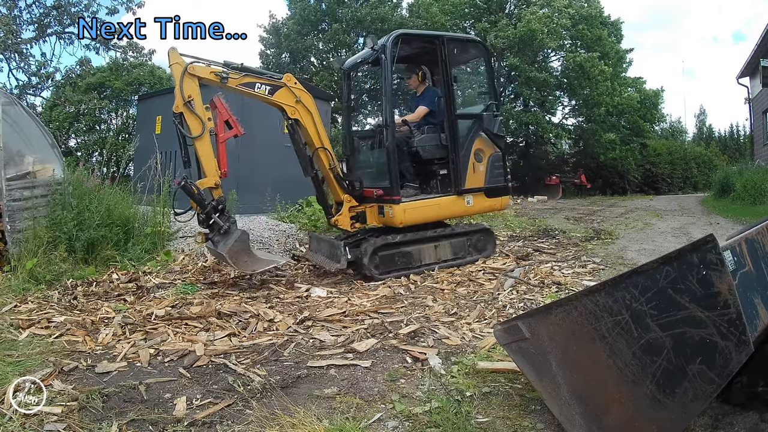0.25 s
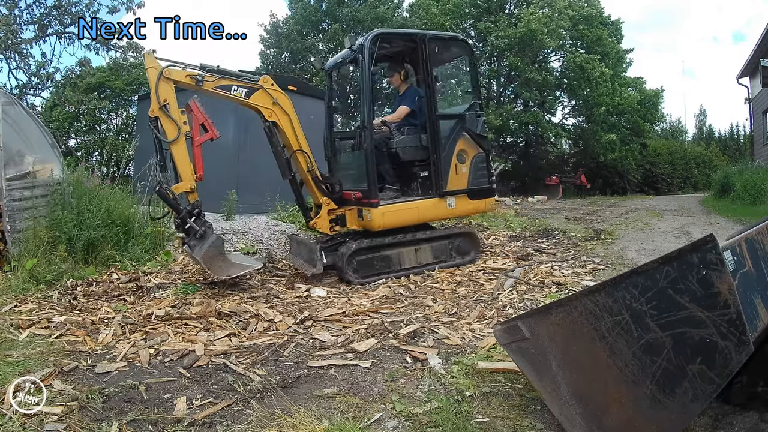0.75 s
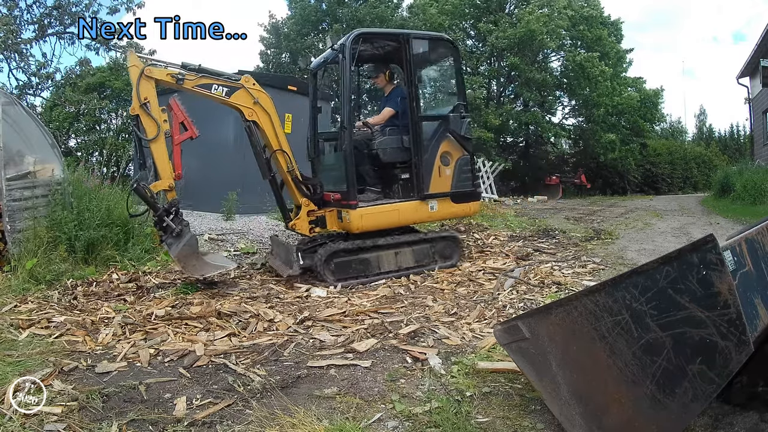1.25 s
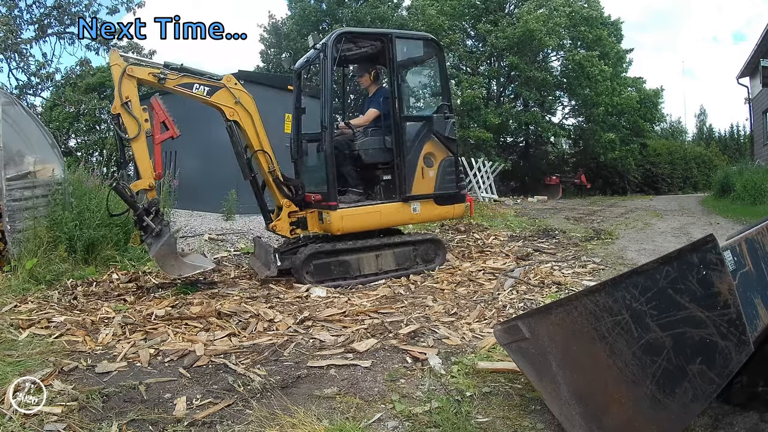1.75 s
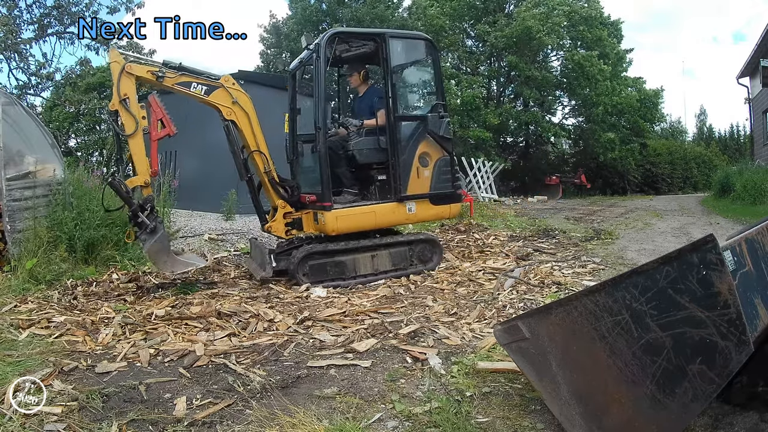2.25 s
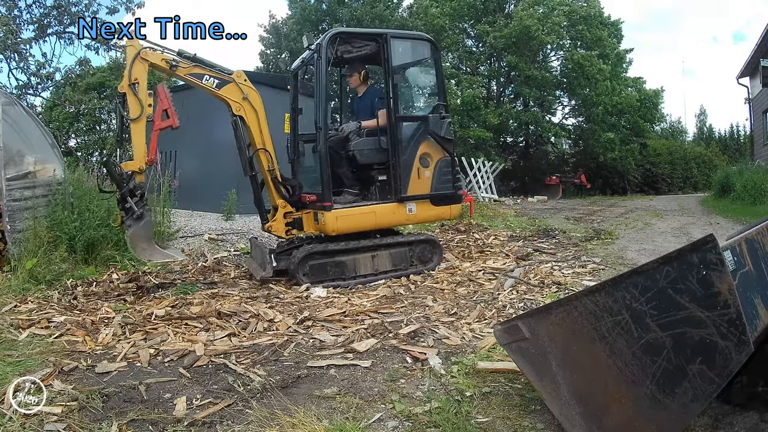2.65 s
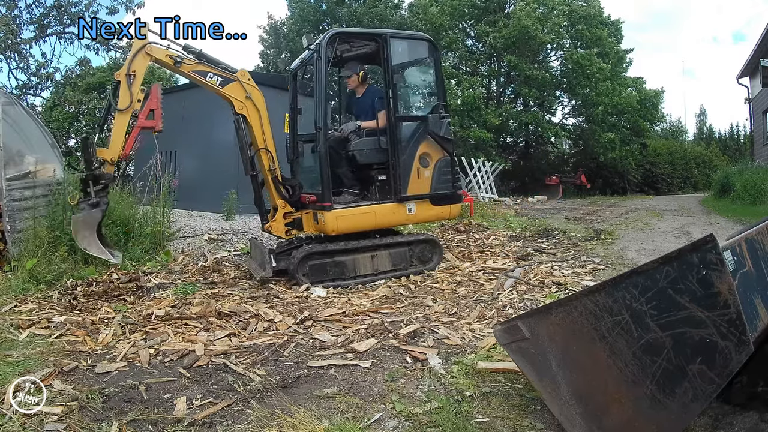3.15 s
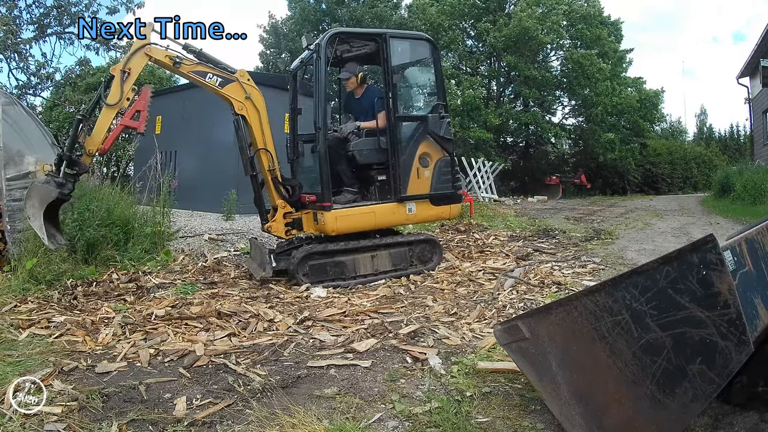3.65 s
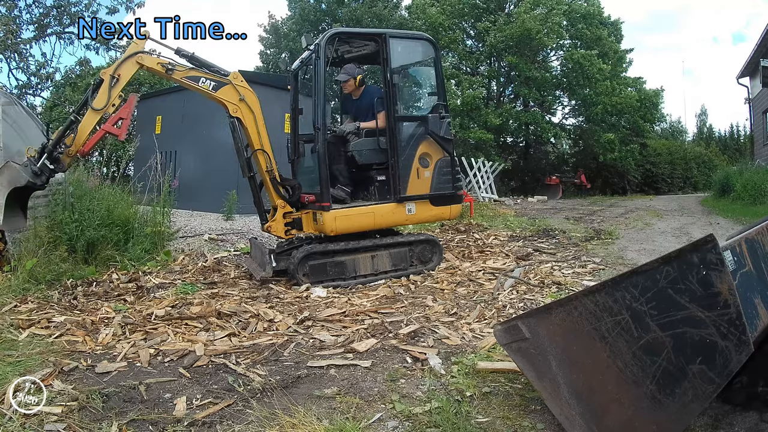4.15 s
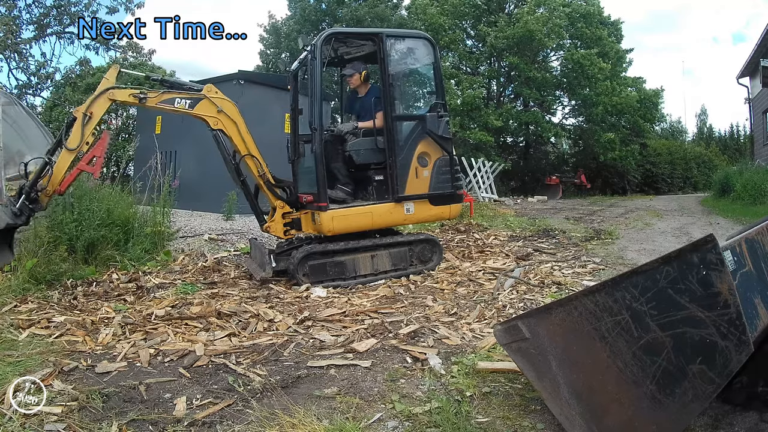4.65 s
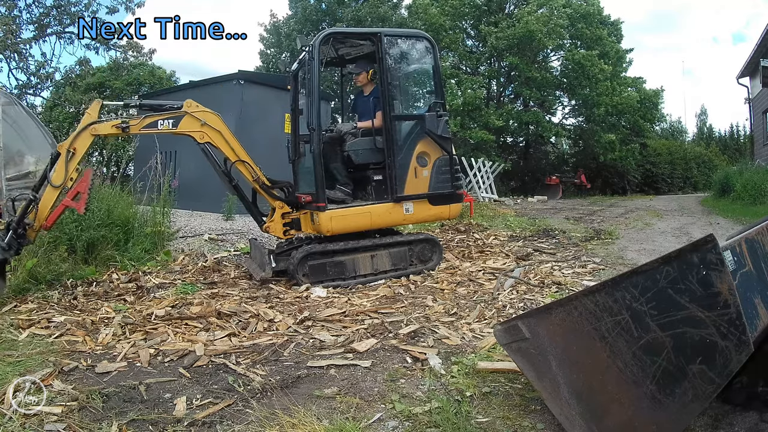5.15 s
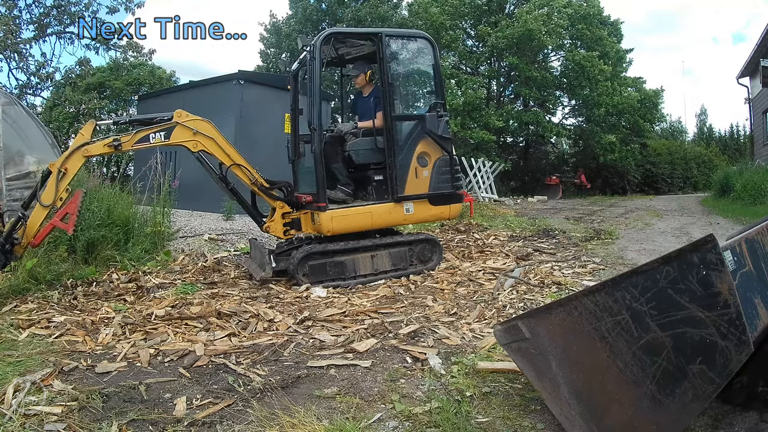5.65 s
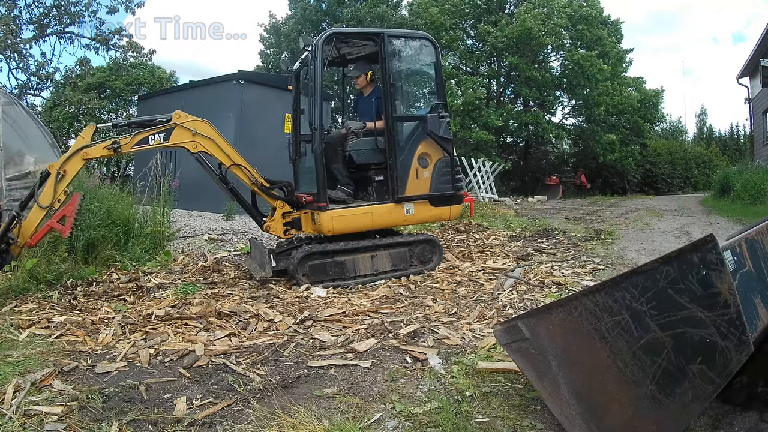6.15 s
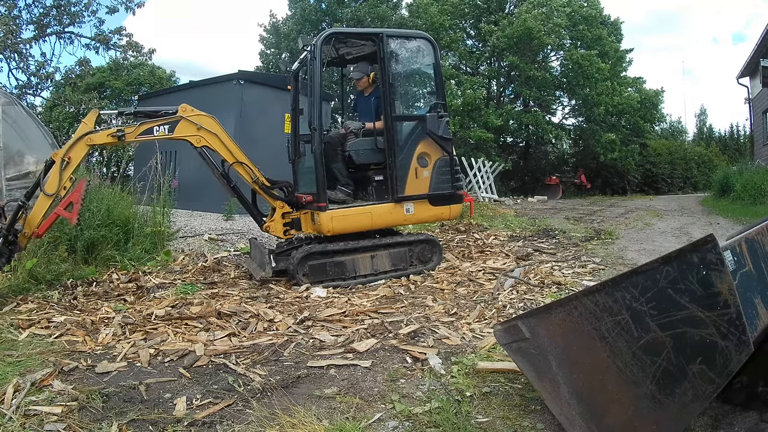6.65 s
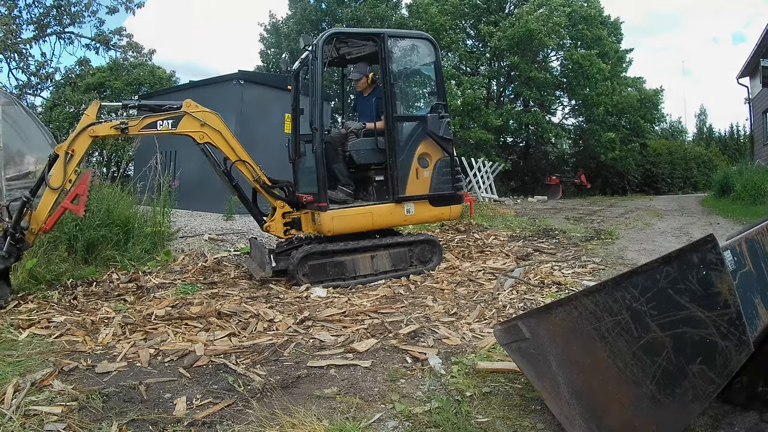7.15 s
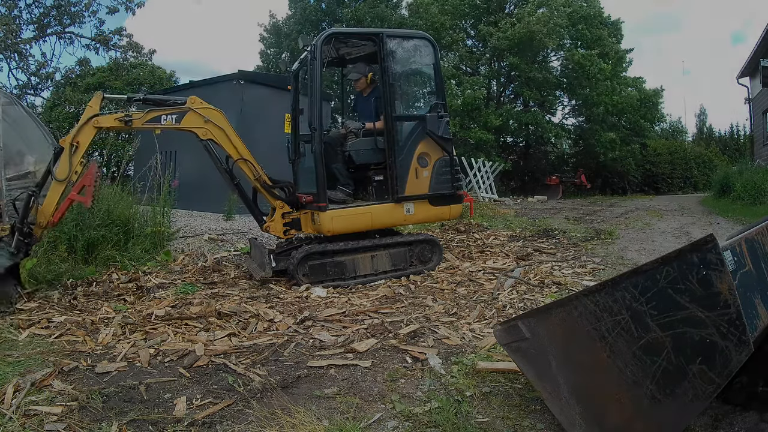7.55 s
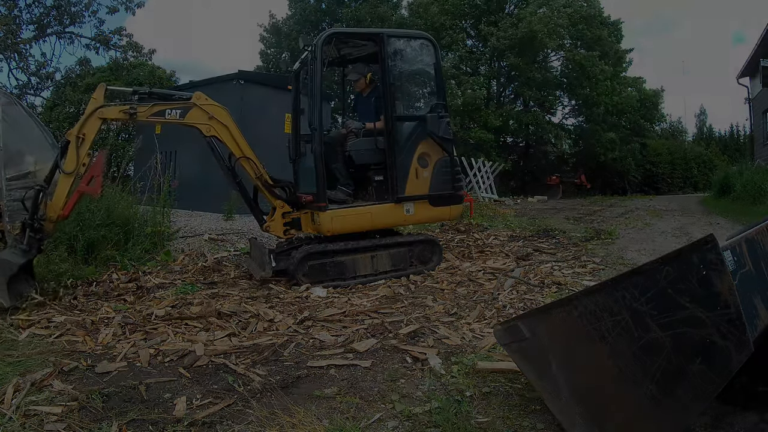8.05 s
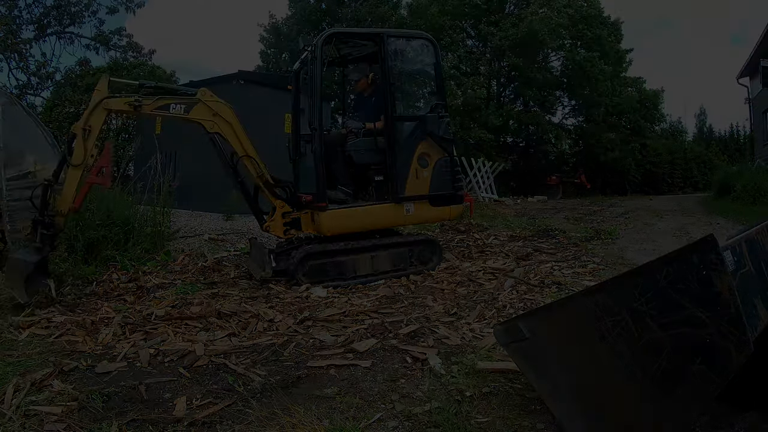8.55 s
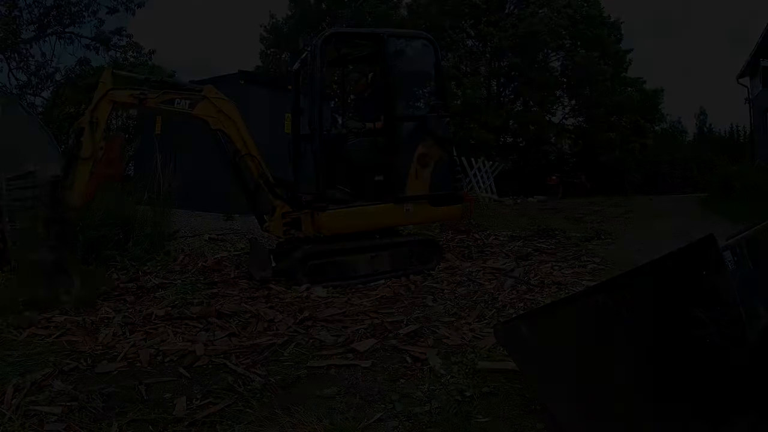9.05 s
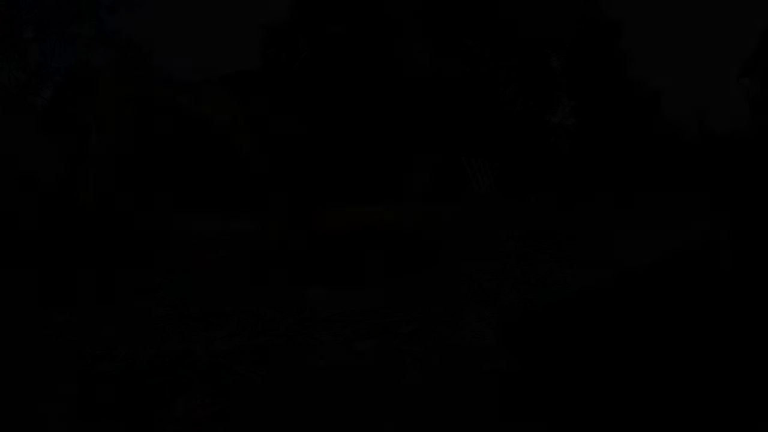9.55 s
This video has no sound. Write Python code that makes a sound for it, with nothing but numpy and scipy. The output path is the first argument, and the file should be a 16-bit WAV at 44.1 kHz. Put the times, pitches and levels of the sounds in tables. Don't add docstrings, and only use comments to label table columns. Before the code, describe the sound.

A small excavator's diesel engine drones steadily outdoors, with early track rattle, wood snaps and metal clanks, a brief digging crunch, then a slow fade.

```python
import sys
import numpy as np
from scipy import signal
from scipy.fft import rfft, irfft, next_fast_len
from scipy.io import wavfile
from scipy.ndimage import uniform_filter1d

SR = 44100
rng = np.random.default_rng(int(sys.argv[2]) if len(sys.argv) > 2 else 0)


def transcribe(u):
    v = np.clip(np.atleast_2d(u).T, -1, 1)
    q = np.round(v * 32767).astype(np.int16)
    wavfile.write(sys.argv[1], SR, q)


def convert_level_to_amplitude(level_db):
    exponent = np.asarray(level_db, float) / 20
    return 10 ** exponent


N = 431290
T = np.arange(N) / SR

# [start_s, speed_rpm]
CRANK_SPEED = [(0.0, 1403.2), (0.93, 1425.3), (1.2, 1386.1), (1.73, 1405.9), (2.08, 1503.1), (2.27, 1360.5),
               (2.54, 1419.5), (2.65, 1313.5), (2.92, 1369.5), (3.93, 1337.8), (4.27, 1391.1),
               (5.83, 1394.5), (6.11, 1448.7), (6.41, 1344.6), (6.9, 1398.5), (7.5, 1354.2), (7.92, 1376.2),
               (9.78, 1371.2)]
# [multiple of the cycle rate, level_db]
EXHAUST_ORDERS = [(1, -42), (2, -36), (3, -20), (4, -29), (5, -23), (6, 0), (7, -18), (8, -21), (9, -14),
                  (10, -32), (11, -29), (12, -25), (13, -26), (14, -23), (15, -10), (16, -38), (17, -44),
                  (18, -27), (19, -33), (20, -38), (21, -18), (22, -34), (23, -42), (24, -20), (25, -33),
                  (26, -41), (27, -27), (28, -46), (29, -49), (30, -31), (31, -36), (32, -48), (33, -27),
                  (34, -46), (35, -43), (36, -37)]
# [chatter_db, panel_1khz_db, thud_db, bright_thud_db]
CYLINDER_KNOCKS = [
    (-7.5, -3.5, -13, -5.5),
    (8, -5, 0, 0),
    (7.5, 5.5, -3, -0.5),
]
# [pitch_hz, width_hz, level_db]
THUD_MODES = [(526, 60, -2), (631, 94, 0), (1900, 230, -15), (1010, 62, 1.5), (2800, 200, -13),
              (5200, 210, -35), (4040, 200, -29)]
# [pitch_hz, width_hz, level_db]
BLOCK_MODES = [(630, 360, 8.5), (960, 140, 3), (1497, 50, 10.5), (1840, 280, 7.5), (3320, 65, -48),
               (3960, 180, -24), (4640, 110, -39), (5170, 160, -32)]
# [place in the cycle 0-1, pitch_hz, width_hz, peak_db]
VALVE_TAPS = [(0.95, 535, 360, -29), (.085, 520, 250, -38.5), (.062, 3000, 1800, -55),
              (.16, 1000, 300, -44), (.375, 1850, 250, -41), (.47, 1900, 480, -46), (.705, 1850, 200, -38),
              (.772, 2020, 220, -39), (.345, 5100, 400, -58), (.65, 1450, 150, -43), (.33, 980, 110, -39),
              (1, 1050, 160, -45.5), (.31, 3950, 280, -54.5), (.69, 3950, 280, -54.5),
              (.88, 3600, 220, -55.5), (.5, 3950, 240, -56), (.69, 5000, 250, -55.5), (.1, 1800, 330, -45),
              (.682, 5150, 350, -56), (.325, 2400, 280, -48.5), (.66, 2850, 290, -47)]
# [pitch_hz, width_hz, level_db]
COVER_MODES = [(2900, 220, -1), (3948, 200, -5.5), (4664, 180, -10), (5150, 260, -14)]
# [pitch_hz, level_db per Hz]
WASH_SPECTRUM = [(240, -24), (400, -1.5), (461, -11), (519, -3), (611, -4), (856, -12), (1010, -10),
                 (1120, -9), (1890, -11), (3190, -32), (3920, -37.5), (5140, -42), (5370, -43), (6980, -72),
                 (11800, -120)]
# [middle_s, half_length_s, peak_db]
ARM_STROKES = [
    (1.403, .4, -65),
    (4.602, .7, -59.5),
    (6.294, 1.1, -69),
]
# [pitch_hz, level_db per Hz]
GROUND_SPECTRUM = [(12, -12), (25, -4), (45, -4.5), (90, 6.5), (150, -21), (300, -46.5)]
# [peak_s, level_db]
RUMBLE_SWELLS = [(0.0, -32), (0.3, -37), (0.74, -34), (1.14, -24), (1.39, -35), (1.71, -37), (2.25, -32.5),
                 (2.57, -27.5), (2.7, -28.5), (3.17, -26), (4.06, -38), (4.96, -41.5), (5.69, -33),
                 (5.88, -30), (6.25, -30), (6.46, -30), (6.6, -28), (6.93, -24.5), (7.11, -32), (7.33, -36.5),
                 (7.869, -36.5), (8.17, -33), (8.4, -38.5), (8.69, -37), (9.2, -34)]
# [pitch_hz, level_db per Hz]
DRONE_SPECTRUM = [(40, -20.5), (80, -18), (135, -11), (200, -8), (260, -5.5), (330, -16.5), (420, -15.5),
                  (600, -36)]
# [pitch_hz, width_hz, level_db]
TRACK_MODES = [(474, 140, 1), (760, 130, 0), (1500, 370, -10), (2900, 900, -14.5)]
# [start_s, peak_db, pitch_hz]
WOOD_SNAPS = [(.0348, -32, 1600), (.0672, -33, 2400), (.2069, -35, 2000), (.2345, -34, 3100),
              (.2927, -31, 3900), (.3375, -34, 3700), (.3506, -33, 2750), (.4329, -30, 1600),
              (.5075, -35, 3900), (.5367, -29, 2100), (.5831, -38, 1420), (.601, -35, 3800),
              (.6559, -33, 1590), (.6918, -35, 1670), (.7153, -34, 1550), (.7716, -35, 1490),
              (.7971, -33, 1600), (.8195, -32, 1630), (.8755, -37, 5200), (.8812, -32, 3800),
              (0.8833, -14, 1300), (0.885, -28, 2600), (.885, -36, 6000), (1.0385, -36, 1620),
              (1.0745, -33, 1890), (1.13, -24, 5300), (1.1567, -23, 5100), (1.157, -25, 3700),
              (1.1572, -36, 8800), (1.1685, -29, 5100), (1.188, -30, 2400), (1.1918, -30, 5000),
              (1.192, -30, 3800), (1.2276, -32, 1630), (1.2456, -35, 3600), (1.2456, -34, 5100),
              (1.2905, -34, 4000), (1.3212, -33, 5000), (1.4365, -27, 3000), (1.508, -35, 1450),
              (1.5584, -33, 1590), (1.6566, -31, 1730), (1.8008, -37, 1460), (2.407, -30, 1000),
              (2.574, -27, 600), (2.599, -30, 4120), (2.62, -28, 2800), (2.6805, -30, 2500),
              (2.722, -30, 2200), (2.76, -29, 2700), (2.785, -28, 2700), (2.794, -29, 2700),
              (4.954, -32, 700), (5.9, -31, 700), (6.411, -34, 2900), (6.499, -28, 900), (6.528, -31, 1800),
              (6.705, -30, 1000), (6.935, -29, 800)]
# [start_s, peak_db, pitch_hz, crack_db]
DULL_CLANKS = [(0.036, -32, 761, -7), (0.073, -26, 760, -22), (0.15, -28.5, 710, -2),
               (0.263, -15, 803, -21.5), (0.29, -22, 854, -5.5), (0.351, -35, 625, 6.5),
               (0.402, -24, 1500, -10), (0.498, -23, 840, -13.5), (0.531, -20.5, 1134, -8),
               (0.549, -23.5, 760, -13), (0.629, -25, 735, -12), (0.737, -24, 776, -18),
               (0.884, -25.5, 1020, -12), (0.966, -21.5, 640, -14), (1.061, -31, 643, -10),
               (1.294, -24, 844, 1), (1.385, -22, 680, -17), (1.437, -21.5, 750, -1),
               (1.599, -23, 670, -22), (1.66, -25, 760, -2), (1.736, -27, 626, -11),
               (1.983, -25, 630, -17.5), (2.353, -27, 594, -3), (2.407, -27, 610, -17),
               (2.679, -28, 735, -10), (2.763, -28, 760, -10)]
# [start_s, peak_db, pitch_hz, crack_db]
PIN_TICKS = [(0.232, -31, 2100, -4), (0.2907, -34, 1810, 0), (0.3003, -24.5, 3800, -4),
             (0.336, -37, 2010, -2), (0.351, -28.5, 2540, -8), (0.4327, -22.5, 2800, -16),
             (0.5036, -34.5, 2380, 0), (0.5987, -33, 2210, 5), (0.7, -41.5, 1830, 5),
             (0.8214, -35, 1950, -1), (0.8674, -29, 3920, 1), (0.883, -30, 2100, -10),
             (1.1294, -17, 3920, 1.5), (1.1918, -30, 3900, -4), (1.245, -37.5, 1870, 15.5),
             (1.2904, -29, 2440, 3), (1.321, -37, 1900, -3), (1.4373, -16, 1950, -10),
             (1.5979, -25.5, 1900, -10.5), (2.263, -35, 1844, -11), (2.3521, -28, 1960, -7),
             (3.054, -37, 1900, -4), (4.065, -36.5, 2110, 9), (6.23, -29.5, 1810, -5),
             (6.9127, -35, 1930, -8)]
# [pitch_hz, level_db, t60_s]
PIN_MODES = [(3914, 0, 0.031), (4950, -28, 0.019), (5440, -29, 0.039), (6611, -33.5, 0.094),
             (7250, -28, 0.24), (8900, -23, 0.041)]
# [start_s, length_s, level_db, body_hz, tilt_db an octave]
DEBRIS_CRUNCHES = [(0.864, 0.028, -39, 3500, 0), (1.289, 0.039, -42, 9300, -10),
                   (0.885, 0.0099, -29.5, 1370, -9.5), (2.574, 0.018, -35, 600, -13.5),
                   (2.598, 0.033, -34.5, 1300, -4), (2.8, .035, -39, 6300, -13),
                   (2.597, .02, -37, 4100, -6), (0.866, 0.029, -43, 8600, -10),
                   (1.13, 0.0074, -37, 3700, -3), (1.157, 0.03, -41, 5400, -2.5),
                   (1.135, .05, -43, 10000, -14), (1.14, .06, -46, 3400, -3.5),
                   (1.1, .012, -45.5, 8400, -12), (2.62, .05, -39, 1500, -12), (2.72, .04, -43, 1700, -18),
                   (6.497, 0.045, -39, 1500, -3), (2.679, 0.04, -33, 1300, -9),
                   (2.758, 0.023, -34, 1600, -12), (2.765, 0.032, -35.5, 2660, -23),
                   (2.685, 0.038, -39, 2000, -19), (6.504, 0.029, -39.5, 1950, -8.5),
                   (6.616, .02, -43, 1900, -2), (6.915, 0.014, -42.5, 2200, 1),
                   (1.149, 0.038, -35, 180, -4), (1.95, 0.2, -31, 140, -16), (2.565, 0.08, -23, 140, -8),
                   (3.4, 0.06, -25, 120, -9), (6.394, 0.094, -27, 120, -16)]
# [pitch_hz, level_db, t60_s]
BUCKET_MODES = [(729, -2, .09), (837, -6, 0.17), (926, 1, 0.15), (1001, -3.5, 0.15), (1130, -4, .18),
                (1511, -3.5, .12), (1640, -7.5, .08), (2196, -15, .08), (2717, -8, .08), (3305, -17, 0.09),
                (4040, -17, .07)]
# [start_s, length_s, level_db, tilt_db an octave]
BUCKET_SCRAPES = [
    (2.598, 0.015, -35, 4.5),
    (2.617, 0.013, -33.5, 3.5),
    (2.679, 0.015, -29, -2),
    (2.701, .012, -32, 0),
    (2.76, .02, -31, 1.5),
    (2.785, 0.015, -32.5, -1),
    (6.499, .02, -37, -1),
    (6.528, 0.016, -37, 0),
]
# [pitch_hz, level_db]
MIC_RESPONSE = [(4800, 0), (5400, -2.5), (6000, -9.5), (6600, -8), (7100, -11.5), (7500, -23.5),
                (8200, -10.5), (9300, -10.5), (9900, -29), (11000, -18), (12000, -42.5), (13000, -21.5),
                (15500, -32.5)]


def evened(x):
    return x / np.sqrt(np.mean(x ** 2) + 1e-20)


def colour(x, points):
    hz, db = np.transpose(points)
    size = next_fast_len(len(x) + 4096)
    log_hz = np.log(np.fft.rfftfreq(size, 1 / SR) + 1)
    return irfft(rfft(x, size) * convert_level_to_amplitude(np.interp(log_hz, np.log(hz), db)), size)[:len(x)]


def ring(x, hz, width):
    return signal.lfilter(*signal.iirpeak(hz, hz / width, SR), x)


def body_ring(x, hz, width):
    return ring(ring(x, hz, width), hz, 2 * width)


def noise():
    return rng.standard_normal(N)


def uneven(strength_db, count):
    return convert_level_to_amplitude(strength_db * np.minimum(rng.exponential(1, count), 4))


def sparse_taps(per_s, strength_db):
    return (rng.random(N) < per_s / SR) * uneven(strength_db, N)


def drift(hz):
    steps = rng.standard_normal(400 * 10)
    slow = signal.lfilter([1], [1, -np.exp(-2 * np.pi * hz / 400)], steps)
    return evened(np.interp(T, np.arange(len(steps)) / 400, slow))


def speed():
    start_s, rpm = np.transpose(CRANK_SPEED)
    flywheel_s = .12
    return uniform_filter1d(np.interp(T, start_s, rpm), size=round(flywheel_s * SR), mode="nearest")


def load():
    free_rpm, db_per_rpm, runaway_db_per_rpm = 1387.6, -0.0528, -0.0969
    over = speed() - free_rpm
    dig_s, unloaded_db = 2.66, -2.5
    unloaded = np.clip((dig_s - T) / 0.14 + .5, 0, 1)
    return -.8 + db_per_rpm * over + runaway_db_per_rpm * np.maximum(over, 0) + unloaded_db * unloaded


def crawl():
    end_s, stop_s = 1.58, 0.76
    return np.clip((end_s + stop_s - T) / stop_s, 0, 1)


def exhaust(cycle):
    boom_db, pump_db, pump_pistons = -17.5, -52.5, 56
    order, db = np.transpose(EXHAUST_ORDERS)
    shape = np.interp(np.arange(513) / 2, np.r_[0, order[2::3], 256], np.r_[-32, db[2::3], -82])
    lag = -signal.hilbert(np.r_[shape, shape[-2:0:-1]] * np.log(10) / 20).imag
    load_db = load() + .8 * drift(10)
    sharpen = {bite: convert_level_to_amplitude(bite * load_db) for bite in (0, .1, .4, .7, 1.1)}
    slew_s, averted_db = 2.4, -6.5
    sharpen[.5] = convert_level_to_amplitude(.5 * load_db + averted_db * np.clip((slew_s - T) / 0.18, 0, 1))
    out = np.zeros(N)
    for n in range(1, len(db) + 1):
        sign = 1 if n % 3 == 0 else -1
        lead = -.005 * (n > 17)
        if n in (9, 12, 18, 36):
            bite = 1.1
        elif 19 <= n <= 25:
            bite, lead = .5, .0145
        elif n == 15:
            bite = .7
        elif n > 25:
            bite = .4
        else:
            bite = .1 * (n > 9)
        order_db = 1.2 * (n in (9, 12, 15)) + 2 * (n in (12, 36)) - (n > 28)
        phase = 2 * np.pi * n * (cycle + lead) + lag[2 * n]
        out += sign * convert_level_to_amplitude(db[n - 1] + order_db) * sharpen[bite] * np.cos(phase)
    out += convert_level_to_amplitude(pump_db - boom_db + 1.1 * drift(6.4)) * np.cos(2 * np.pi * pump_pistons * cycle)
    return np.sqrt(2) * convert_level_to_amplitude(boom_db + .35 * drift(10)) * out


def knock(cycle):
    firing = 3 * cycle + 0.1203
    count = np.floor(firing).astype(int)
    since_s = (firing - count) / 36.0
    chatter_db, panel_db, thud_db, bright_db = np.transpose(CYLINDER_KNOCKS)[:, count % 3]
    luck = rng.standard_normal((400, 2))[count + 1]
    click = np.diff(count, prepend=count[0]) * convert_level_to_amplitude(thud_db + 0.5 * luck[:, 0])
    thuds = np.zeros(N)
    for k, (hz, width, db) in enumerate(THUD_MODES):
        part = (-1) ** k * convert_level_to_amplitude(db) * body_ring(click, hz, width) / np.sqrt(width)
        if k == 3:
            lag_s = .0016
            part = np.roll(part * convert_level_to_amplitude(uniform_filter1d(panel_db, size=100)), round(lag_s * SR))
        thuds += part * convert_level_to_amplitude(bright_db * (hz > 1500))
    burst = (1 - np.exp(-since_s / 0.0044)) * np.exp(-since_s / 0.0096)
    chatter = convert_level_to_amplitude(chatter_db + 1.3 * luck[:, 1]) * burst * noise() * uneven(2.5, N)
    rings = sum(convert_level_to_amplitude(db) * ring(chatter, hz, width) / np.sqrt(width) for hz, width, db in BLOCK_MODES)
    airborne = colour(chatter, WASH_SPECTRUM[:-1])
    body = 1.2 * evened(thuds) + .5 * evened(rings) + .5 * evened(airborne)
    return convert_level_to_amplitude(-41.5 + .45 * load()) * evened(body)


def tappets(cycle):
    out, click = np.zeros(N), np.arange(1500) == 0
    luck = rng.standard_normal((len(VALVE_TAPS), 130))
    for (place, hz, width, db), row in zip(VALVE_TAPS, luck):
        count = np.floor(cycle - place).astype(int)
        taps = np.diff(count, prepend=count[0]) * convert_level_to_amplitude(db + 2.3 * row[count + 2])
        shape = ring(ring(click, hz, width), hz, width)
        out += signal.oaconvolve(taps, -shape / abs(shape).max())[:N]
    return out * convert_level_to_amplitude(0.5 * load())


def covers(cycle):
    firing_db = 5.5 * np.cos(2 * np.pi * (3 * cycle - .05))
    cycle_db = 3 * np.cos(2 * np.pi * (cycle - .55))
    bunch = convert_level_to_amplitude(firing_db + cycle_db + 0.46 * load())
    out = np.zeros(N)
    for hz, width, db in COVER_MODES:
        out += convert_level_to_amplitude(db) * evened(body_ring(sparse_taps(350, 3.5) * bunch, hz, width))
    return convert_level_to_amplitude(-60) * out


def wash():
    fan_db = -39.5 + 1.5 * crawl() + .15 * load() + 0.79 * drift(8.2)
    fan = convert_level_to_amplitude(fan_db) * evened(colour(noise(), WASH_SPECTRUM[:-1]))
    oil = evened(ring(ring(noise(), 8800, 1500), 8800, 1500))
    flow = convert_level_to_amplitude(-66.5) + sum(convert_level_to_amplitude(db) * np.exp(-((T - s) / half) ** 2) for s, half, db in ARM_STROKES)
    return fan + flow * convert_level_to_amplitude(1.6 * drift(20)) * oil


def rumble():
    rise_s, fall_s = 0.039, .07
    t = T[::100]
    swells = np.zeros(len(t))
    for s, db in RUMBLE_SWELLS:
        swells += convert_level_to_amplitude(db) * np.exp(-abs(t - s) / np.where(t < s, rise_s, fall_s))
    lumps = convert_level_to_amplitude(np.minimum(4.3 * drift(21), 5))
    shake = (convert_level_to_amplitude(-48) + np.interp(T, t, swells)) * lumps * evened(colour(noise(), GROUND_SPECTRUM))
    drone_db = -43 - 0.63 * np.clip(load(), -7, 0) + 2.0 * drift(33)
    return shake + convert_level_to_amplitude(drone_db) * evened(colour(noise(), DRONE_SPECTRUM))


def shudder():
    return convert_level_to_amplitude(-40 + 0.45 * load()) * evened(ring(ring(noise(), 132, 45), 132, 70))


def tracks():
    taps = sparse_taps(260, 4.0) * np.sign(noise())
    rings = sum(convert_level_to_amplitude(db) * body_ring(taps, hz, width) / np.sqrt(width) for hz, width, db in TRACK_MODES)
    return convert_level_to_amplitude(-43.5) * crawl() * evened(rings)


def snap(db, hz):
    t = np.arange(900) / SR
    tone = [(hz / 4, -14), (hz, 0), (hz * 3, -8), (16000, -25)]
    crack = convert_level_to_amplitude(-8 - 60 * t / .012) * evened(colour(rng.standard_normal(len(t)), tone))
    cycles = 12
    click = convert_level_to_amplitude(-60 * t * np.sqrt(hz * 1500) / cycles) * np.sin(2 * np.pi * hz * t)
    return convert_level_to_amplitude(db) * (click + crack) * np.minimum(t / .0004, 1)


def blow(db, hz, t60, crack_db, modes, tone_hz):
    t = np.arange(6000) / SR
    pair = np.sin(2 * np.pi * hz * t) + 0.38 * np.sin(2 * np.pi * hz * rng.uniform(1.04, 1.12) * t)
    sound = 0.65 * pair * convert_level_to_amplitude(-60 * t / t60)
    for f, level_db, decay in modes:
        upper = np.sin(2 * np.pi * f * rng.uniform(0.9, 1.04) * t)
        sound += convert_level_to_amplitude(level_db + crack_db) * upper * convert_level_to_amplitude(-60 * t / min(decay, .045))
    tone = [(tone_hz / 4, -20), (tone_hz, 0), (tone_hz * 3, -6.0), (16000, -12)]
    crack = evened(colour(rng.standard_normal(len(t)), tone))
    sound += convert_level_to_amplitude(crack_db - 9 - 60 * t / 0.03) * crack
    return convert_level_to_amplitude(db) * sound * np.minimum(t / 0.0007, 1)


def clank(db, hz, crack_db):
    return blow(db, hz, 0.059, crack_db, [], 1200)


def tick(db, hz, crack_db):
    return blow(db, hz, 0.027, crack_db, PIN_MODES[1:], 2500)


def crunch(length, db, body_hz, tilt_db):
    t = np.arange(9000) / SR
    snaps = rng.standard_normal(len(t)) * uneven(2.7, len(t))
    tone = [(body_hz / 6, -22), (body_hz / 2, -7), (body_hz, 0), (body_hz * 1.17, -6),
            (body_hz * 24, 4 * tilt_db - 22.5)]
    envelope = np.minimum(t / 0.0013, 1) * convert_level_to_amplitude(-1500 * np.maximum(t - length, 0))
    return convert_level_to_amplitude(db) * evened(colour(snaps, tone)) * envelope


def scrape(length, db, tilt_db):
    t = np.arange(12000) / SR
    slips = rng.standard_normal(len(t)) * uneven(4.2, len(t)) * convert_level_to_amplitude(-500 * t) * (t < length)
    plate = np.zeros(len(t))
    for hz, level_db, t60 in BUCKET_MODES:
        mode_db = level_db + tilt_db * np.log2(hz / 1000) + 1.5 * rng.standard_normal()
        plate += convert_level_to_amplitude(mode_db - 60 * t / t60) * np.sin(2 * np.pi * hz * t)
    sound = signal.fftconvolve(slips, plate)[:len(t)]
    return convert_level_to_amplitude(db) * sound / np.sqrt(np.mean(sound[:1300] ** 2))


def metal_and_debris():
    hits = np.zeros(N)
    for source, events in ((snap, WOOD_SNAPS), (clank, DULL_CLANKS), (tick, PIN_TICKS),
                           (crunch, DEBRIS_CRUNCHES), (scrape, BUCKET_SCRAPES)):
        for start_s, *settings in events:
            sound = source(*settings)
            part = hits[round(start_s * SR):][:len(sound)]
            part += sound[:len(part)]
    return hits


def yard(x):
    n = np.arange(9000)
    taps = rng.standard_normal(9000) * (rng.random(9000) < .05) * convert_level_to_amplitude(-60 * n / SR / 0.28)
    taps[:300] = 0
    return x + convert_level_to_amplitude(-13.5) * signal.oaconvolve(x, taps / np.linalg.norm(taps))[:N]


def scene():
    cycle = -.079 + np.cumsum(speed()) / SR / 120
    echoing = yard(knock(cycle) + tappets(cycle) + covers(cycle) + metal_and_debris())
    return (exhaust(cycle) + echoing + wash() + rumble() + shudder() + tracks())[None]


def treble_gate(x, below_db, depth_db):
    hz, t, z = signal.stft(x, SR, nperseg=2048)
    usual = uniform_filter1d(abs(z), size=32, axis=0)
    quiet = usual < convert_level_to_amplitude(13) * np.median(usual, axis=1, keepdims=True)
    weak = (abs(z) < convert_level_to_amplitude(below_db) * usual) & quiet
    share = np.clip((hz[:, None] - 4600) / 1200, 0, 1)
    return signal.istft(z * convert_level_to_amplitude(-depth_db * share * weak), SR, nperseg=2048)[1][:N]


def low_pass(x):
    return signal.sosfilt(signal.butter(12, 15700, fs=SR, output="sos"), x)


def record(dry):
    fade_start_s, fade_end_s = 7.19, 10.12
    fade = np.clip((fade_end_s - T) / (fade_end_s - fade_start_s), 0, 1)
    onset = np.minimum(T * 200, 1)
    heard = colour(dry[0] * fade * onset, MIC_RESPONSE)
    mix = treble_gate(heard, 4.5, 28)[None]
    return low_pass(mix)


dry = scene()
out = record(dry)
transcribe(out)
```